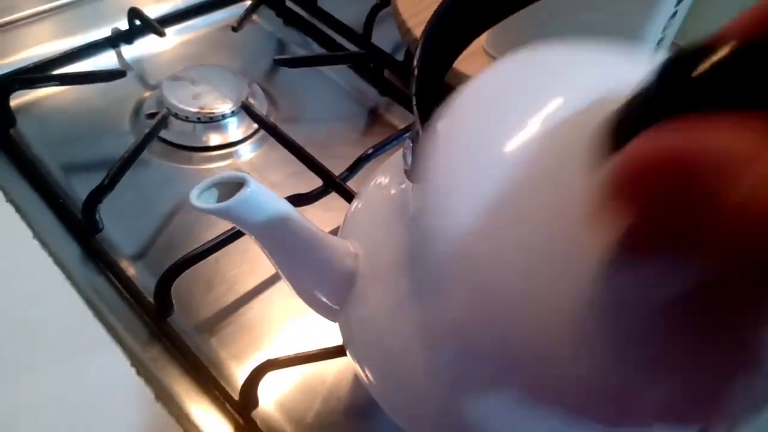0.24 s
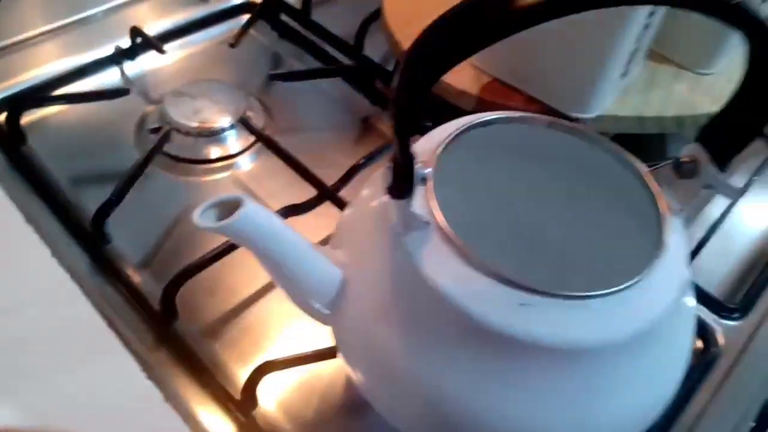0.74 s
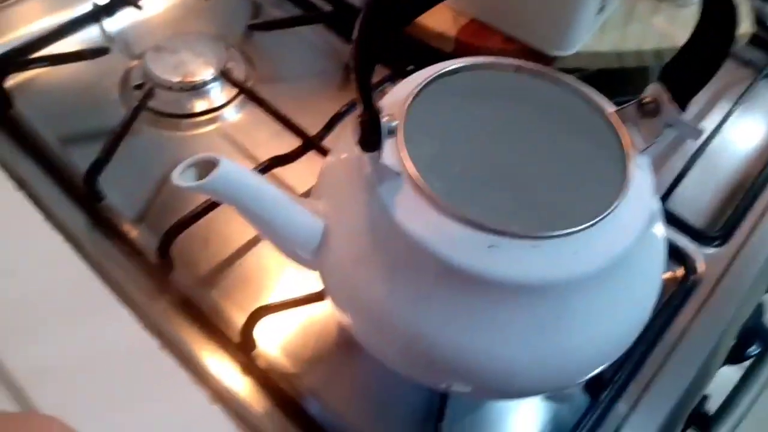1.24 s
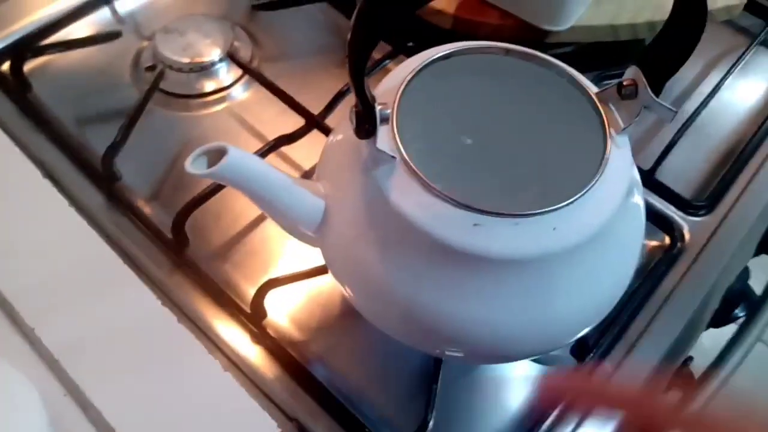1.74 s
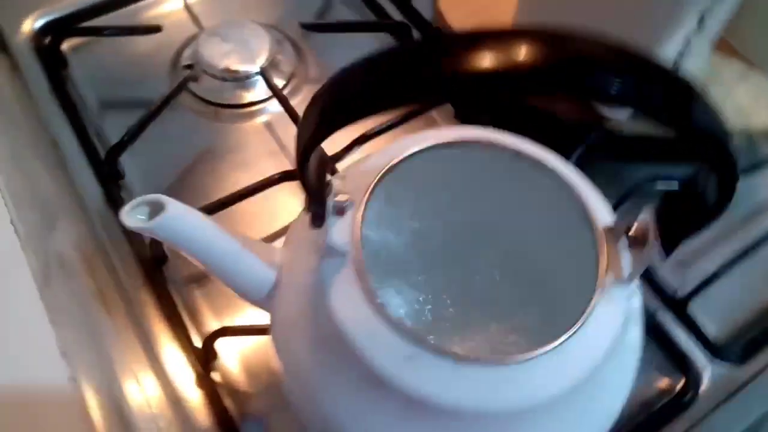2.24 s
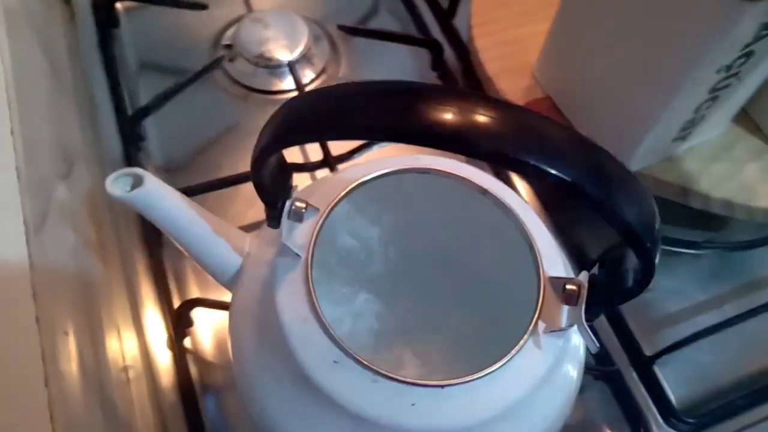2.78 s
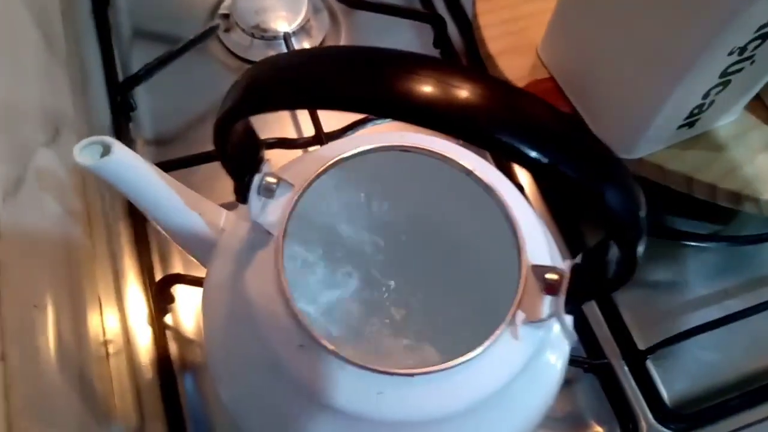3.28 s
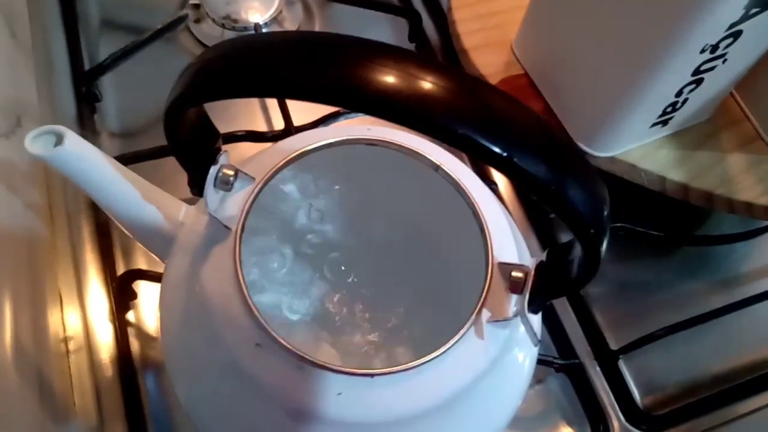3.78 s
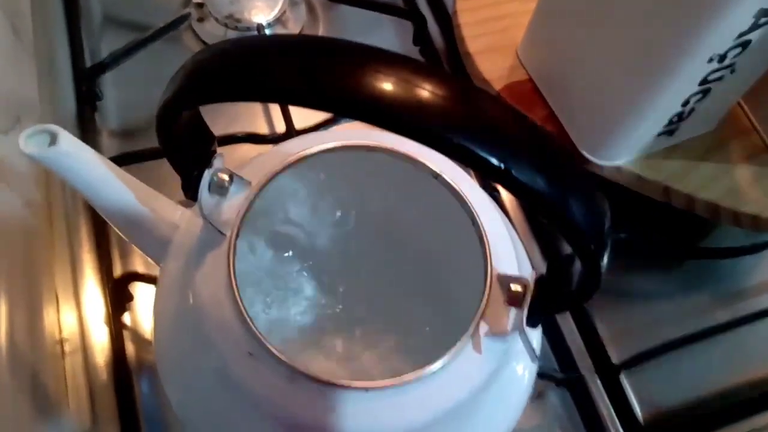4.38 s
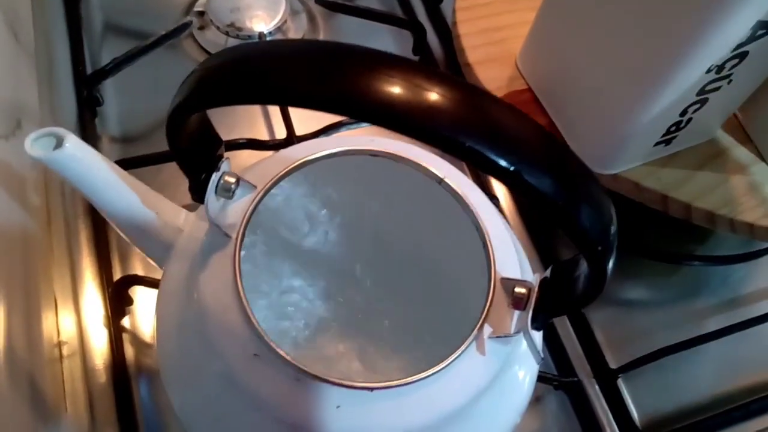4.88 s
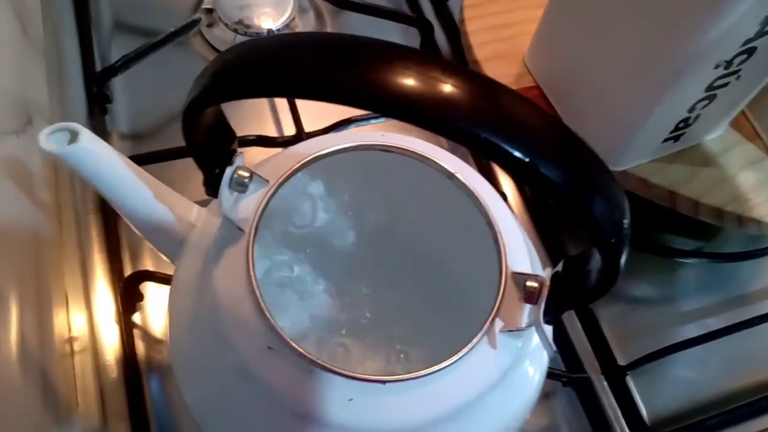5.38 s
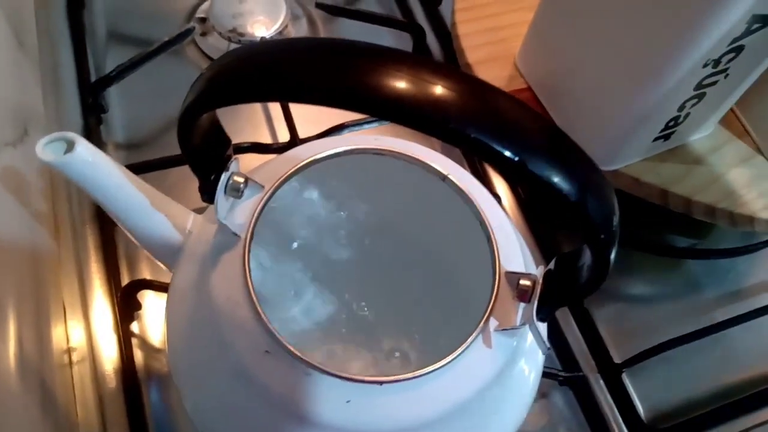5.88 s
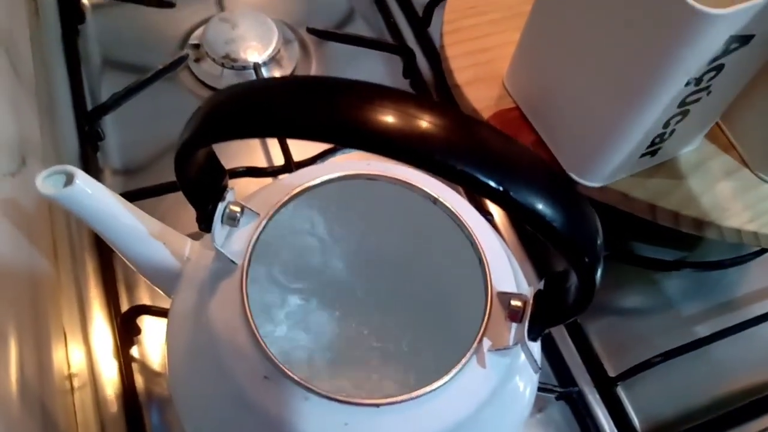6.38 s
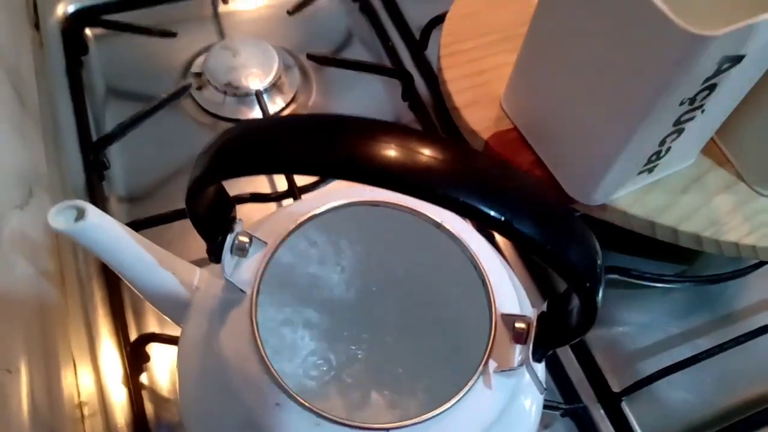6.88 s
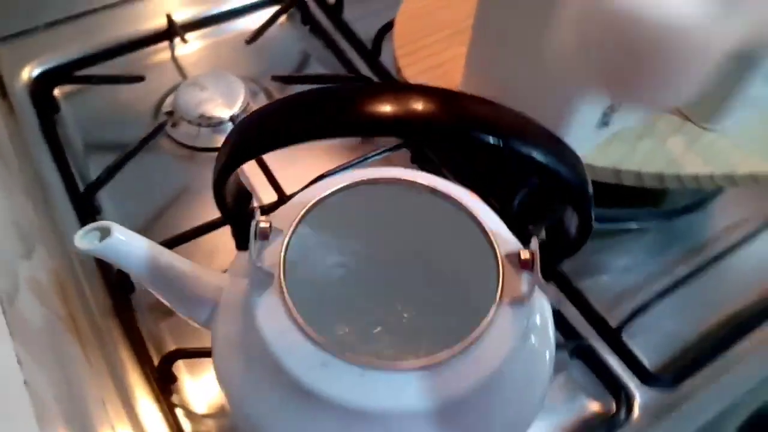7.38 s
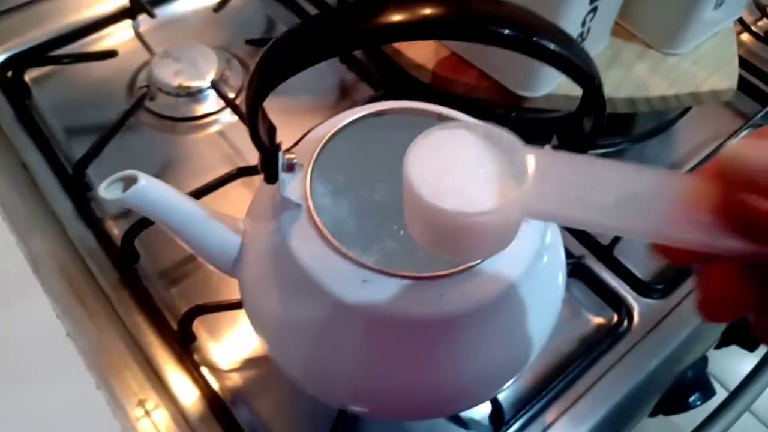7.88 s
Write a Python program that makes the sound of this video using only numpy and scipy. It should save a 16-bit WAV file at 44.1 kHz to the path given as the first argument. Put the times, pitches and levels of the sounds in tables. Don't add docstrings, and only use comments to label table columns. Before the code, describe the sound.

A metal kettle lid clatters down and is stilled beside a hissing gas stove, water simmers softly, then dull box knocks and a loud hollow thud.

```python
import sys
import numpy as np
from scipy import signal
from scipy.fft import rfft, irfft
from scipy.io import wavfile
from scipy.ndimage import uniform_filter1d

SR = 44100
rng = np.random.default_rng(int(sys.argv[2]) if len(sys.argv) > 2 else 0)


def natural_amplitude(level_db):
    exponent = np.asarray(level_db, float) / 20
    return 10 ** exponent


def persist_wave(psi):
    counts = np.round(np.clip(psi, -1, 1) * 32767).astype(np.int16)
    wavfile.write(sys.argv[1], SR, np.atleast_2d(counts).T)


N = 358533

# f/Hz, density/dB per Hz
HISS = [(15, -74), (25, -44.5), (53, -12.5), (114, -9), (157, -12), (317, 3), (545, -7.5), (796, -2.5),
        (1070, -9.5), (1650, -12.5), (1940, -11.5), (3080, -11.5), (10100, -12), (14800, -23),
        (16000, -21.5)]
HISS_DB = -52
# f/Hz, correlation/1
HISS_LIKENESS = [(60, -1.3), (180, 1), (550, 0.8), (1650, -0.29), (4970, 0.19), (15000, -0.2982)]
# f/Hz, left over right/dB
HISS_LEAN = [(60, 0), (180, 0), (550, 1), (1650, -5), (4970, -1), (15000, -5)]
# t/s, level above 3 kHz/dB, left over right/dB
FLAME = [(0.0, -57.5, -6.5), (0.47, -59, 3.5), (0.9, -55, 1), (1.58, -56.5, 0), (2.47, -55.5, -0.5),
         (3.1, -59, 0), (3.51, -56, -1), (4.01, -59, -2), (4.55, -56, -2.5), (5.07, -59, -6.5),
         (5.25, -55, -2), (6.25, -57, -3.5), (8.13, -57.5, -3.5)]
# f/Hz, width/Hz, level/dB
KETTLE = [(366, 310, -7), (792.6, 38.4, 8), (1960, 104, -1.5), (2674, 41, -7), (3910, 21.6, 4),
          (4727.3, 8.3, 5), (7150, 114, -4.5), (9010, 64, -39), (10040, 42, -3), (10752, 300, -9)]
# t/s, peak/dB, f/Hz, left over right/dB
POPS = [(0.004, -38, 567, -6), (0.136, -38, 1960, -5), (0.196, -40, 680, 3), (0.354, -41, 734, 3),
        (0.386, -37.5, 730, -2), (0.409, -44, 704.8, 0.5), (0.436, -38.5, 890, -6.5),
        (0.466, -41, 840, -4.5), (0.698, -41, 910, 0), (0.775, -42, 760.3, 0), (2.516, -47, 965.3, 7),
        (2.568, -35, 2030, 9), (2.58, -36, 2000, 3), (2.587, -40, 795, 0.0), (2.745, -37, 784.4, -7),
        (2.755, -38, 2050, -3), (4.972, -42, 2050, -3), (4.116, -44, 2600, -5), (2.856, -42, 744, -2),
        (4.06, -40.5, 1960, -9), (4.824, -40, 1950, -1), (4.579, -38, 1999, -13), (4.591, -46, 1500, -6.0),
        (5.402, -37, 1960, -9), (5.585, -39, 790, -10.5), (5.902, -35.5, 831.8, -5),
        (6.149, -48, 742.8, -13), (6.653, -38.5, 800, -11), (6.686, -36.5, 834, -9), (6.752, -42, 830, 1.5),
        (6.987, -43.5, 841.8, -7), (7.182, -41, 844, -3), (7.651, -39, 710, -7.5),
        (7.951, -38.5, 648.2, -5), (7.985, -44.5, 840.2, -10)]
TICKS_PER_S, TICK_DB = 30, -52

# t/s, length/s, level/dB, centre f/Hz
RUSTLE = [(0.0, 0.076, -62, 1900), (0.145, 0.19, -59, 1590), (0.31, 0.29, -56.5, 1130),
          (0.61, 0.1339, -58.5, 1198), (0.793, 0.1714, -55, 1150), (1.5, 0.1688, -63, 1694),
          (1.73, 0.049, -55, 2173), (1.86, 0.04, -52.5, 2511), (2.192, 0.22, -60.5, 1986),
          (7.14, 0.0417, -75, 1802), (7.243, 0.2613, -57, 2600), (7.525, 0.35, -62, 2100),
          (7.991, 0.0682, -69, 2201)]
SWEEP = 0.061

# f/Hz, t60/s
ROOM = [(100, 0.5985), (400, 0.3), (1500, 0.33), (5000, 0.2606), (15000, 0.42)]

# t/s, t60/s, force/dB, weight on the worktop/dB, grit/dB
SHOVES = [(2.635, 0.18, -40.5, -9, -20), (2.72, 0.976, -53.5, -7, -13), (2.9, 0.44, -50, -10, -6),
          (3.1, 0.46, -49, -21, -23), (3.261, 0.39, -41, -12, -23), (3.322, 0.2, -45, -18, -12),
          (4.08, 0.27, -38, -11.5, -17), (4.245, 0.25, -39, -9, -34), (4.33, 0.437, -41.5, -15, -17),
          (4.38, 0.3, -39, -18, -16), (4.46, 0.2705, -59, 0, -1), (4.79, 0.45, -55.5, 4.5, 5),
          (4.86, 0.31, -39, -12, -6.5), (5.12, 1, -42, -13, -1.5), (5.2, 0.99, -52, -9.5, 4.5),
          (5.418, 0.2512, -42.5, -2, -26.5), (5.52, 1, -59, 0, 1)]
SHOVE_RISE_S = [0.033, 0.014, 0.0078]
SHOVE_STRETCH = [1.3693, 1.19, 0.67]

# t/s, peak/dB, body f/Hz, t60/s, crack over peak/dB
KNOCKS = [(2.567, -43, 247, 0.04, 0.5), (2.624, -31.5, 275, 0.033, -21), (4.298, -39, 298, 0.036, -20),
          (4.421, -40, 237, 0.068, -20), (2.627, -27, 521, 0.065, -6.5), (2.638, -25, 488, 0.053, -9.5),
          (2.655, -33, 480, 0.034, -18.5), (3.104, -43, 262, 0.0669, -22.5), (3.158, -45, 247.7, 0.09, -17),
          (3.261, -48.5, 334, 0.0463, 8), (3.328, -28.5, 462.8, 0.041, -3.5),
          (4.083, -32, 483.2, 0.01508, -9), (4.119, -44, 576, 0.066, -6), (4.2455, -18, 520, 0.03, -12.5),
          (4.269, -48, 500, 0.0822, 5), (4.407, -39, 355, 0.075, -1)]
KNOCK_TILT_DB = -9
# frequency ratio/1, level/dB
OVERTONES = [(1, -3.5), (1.95, -13.5), (2.7, -15), (3.5, -26), (4.7, -28)]
# t/s, peak/dB, blow t60/s, crack over peak/dB
SLAMS = [(4.33, -32.5, 0.0461, -4), (4.35, -46, 0.3, -10), (4.385, -30, 0.017, -25),
         (4.854, -20.5, 0.0095, 2.5), (5.108, -8.5, 0.019, 1.5), (5.258, -39.5, 0.16, -12),
         (5.17, -35, 0.023, -10), (5.2, -32.5, 0.058, -6), (5.291, -41, 0.03, -5)]
# f/Hz, width/Hz, level/dB
SLAM_PANELS = [
    [(887, 25.36, 6.5), (2100, 37.36, -20), (3020, 60, -3), (4250, 13.04, 2.5), (4690, 68.9, -35.5)],
    [(890, 14, 3), (1280, 46, -1), (2038, 98.2, -14), (3000, 20, -6)],
    [(328, 22, -9), (834, 34, -7), (1076, 44, -2.5), (1440, 14, -6), (2870, 20.86, -18)],
    [(329, 13, -2), (530, 19, 2), (703, 15, 3), (900, 9.3, 2.5), (1331, 44, 1.5), (1760, 30, -1.5),
     (2600, 200, -14), (4000, 900, -16)],
    [(432, 18, 12), (539.9, 30, 10.5), (692, 52, 6.5), (382, 32, 2), (783, 33, 3.5), (1180, 150, -4.5),
     (1500, 140, -0.5), (1750, 100, -1.5), (2050, 160, 0), (2710, 40, -6), (3270, 110, -14),
     (4300, 170, -11.5)],
    [(1500, 60, -2), (2100, 20.75, 3), (3890.3, 40, -2.5), (4770, 55.69, -7)],
    [(500, 40, 1), (1850, 20, -1)],
    [(550, 45, 5), (1780, 230, -3), (3600, 91, -9), (4200, 100, -12)],
    [(1500, 30, 7), (2000, 30, -6)],
]

# f/Hz, width/Hz, level/dB
TOUCH_MODES = [(826.0, 9.3, -3), (1083.0, 11.0, 2.0), (1290.0, 199.4, -8.5), (1860, 27, -20),
               (2222, 25, 13), (3400, 37.3, -3), (3975, 50, -2), (4820, 87.9, -30), (6150, 35, 4.5),
               (8900, 40, -2), (9700, 64.1, -20.5), (10278, 36, -26), (11140, 32, -15.5),
               (14700, 49.5, -28.0)]
# f/Hz, width/Hz, level/dB
DROP_MODES = [(1000.0, 290, 6.0), (1380.0, 25.95, 2.5), (840, 75, 2), (1865, 35, 0), (2190, 47.0, 3),
              (2480, 34.0, -12), (3310, 300, -1.5), (3960, 106, 4.5), (6160, 65, 6.0), (8850, 90, 2),
              (9877.2, 67.0, -2.5), (11700, 34.0, -10.5), (13400, 200, -19), (14800, 300, -18)]
# f/Hz, width/Hz, level/dB
ROLL_MODES = [(833, 5.8, 0), (1050, 200, -8.5), (1380, 250, -14.5), (1660, 30, -17), (1950, 180, -17.5),
              (2290, 66, 9.5), (2470, 25, 2), (3170, 220, 0.5), (4000, 80, 0.5), (6170, 120, 3),
              (8830, 110, 1.5), (9820, 57, -3.5), (12060, 46, -11), (14700, 200, -25)]
CHATTER_PER_S = [900, 900, 1200]
GRIP_DB_PER_S = [506, 506, 2200]
# start t/s, grip t/s, end t/s
PHASES = [
    (0.972, 1.082, 1.133),
    (1.131, 1.261, 1.258),
    (1.257, 1.364, 1.5),
]
# t/s, held/s, force/dB, dome share/dB, rim share/dB
CONTACTS = [
    [(0.972, 0.016, -27.5, -13.5, -5), (1.012, 0.024, -32.5, -7.5, -4), (1.055, 0.05, -46, 9, 3)],
    [(1.134, 0.0011, -24, -12, 4), (1.155, 0.025, -43, -5, -1), (1.19, 0.0097, -32.5, -3, -6.5),
     (1.218, 0.022, -31.5, -7, -12)],
    [(1.259, 0.021, -34.5, 6, -1.5), (1.286, 0.028, -35, 9, -0.5), (1.335, 0.032, -34.5, 9.5, -4),
     (1.37, 0.02, -58, 3, 5), (1.4, 0.022, -55, 1, -13), (1.468, 0.02897, -55.5, 11.5, -6)],
]
LID_RISE_S = [0.00622, 0.00048, 0.0046]
LID_T60 = [0.25, 0.14, 0.1]
# f/Hz, left over right/dB
LID_LEAN = [(60, 0.0), (150, -0.5), (380, -6), (950, -8), (2380, -11), (5980, -5), (15000, -15)]
# t/s, peak/dB, tilt/dB per octave
BLOWS = [
    (0.973, -16, -10),
    (0.984, -22, -12),
    (0.993, -23, -12),
    (1.032, -21, -9),
    (1.127, -19, -6),
    (1.135, -7.5, -8.5),
    (1.141, -20, -6),
    (1.262, -30, -9),
]


def evened(x):
    return x / np.sqrt(np.mean(x ** 2) + 1e-20)


def read(points, hz):
    f, value = np.transpose(points)
    return np.interp(np.log(hz + 1), np.log(f + 1), value)


def add(mix, s, sound):
    part = mix[..., round(s * SR):][..., :sound.shape[-1]]
    part += sound[..., :part.shape[-1]]


def sides(x, pan_db):
    return x * natural_amplitude(np.array([[pan_db / 2], [-pan_db / 2]]))


def ring(x, hz, width):
    r = np.exp(-np.pi * max(width, 1) / SR)
    turn = 2 * np.pi * hz / SR
    return signal.lfilter([np.sin(turn)], [1, -2 * r * np.cos(turn), r * r], x)


def band(x, lo_hz, hi_hz):
    return signal.sosfilt(signal.butter(2, [lo_hz, hi_hz], "band", fs=SR, output="sos"), x)


def clicks(size, per_s, spread_db):
    happens, sign, force = rng.random((size, 3)).T
    size_db = spread_db * np.minimum(-np.log(force + 1e-9), 4)
    return (happens < per_s / SR) * np.sign(sign - .5) * natural_amplitude(size_db)


def crack(tilt_db, t60):
    t, hz = np.arange(2048) / SR, np.fft.rfftfreq(2048, 1 / SR)
    gain = natural_amplitude(tilt_db * np.log2(np.maximum(hz, 600) / 600)) * (hz > 250)
    noise = irfft(rfft(rng.standard_normal(2048)) * gain)
    burst = noise * natural_amplitude(-60 * t / t60) * np.minimum(t / 0.0001666, 1)
    return burst / abs(burst).max()


def stroke(t, s, rise, hold, t60):
    u = t - s
    release = natural_amplitude(-60 * np.clip(u - rise - hold, 0, 9) / max(t60, .01))
    return np.clip(u / max(rise, 1e-4), 0, 1) * release


def kitchen(x):
    taps = np.zeros((2, 24000))
    slots = np.arange(150, 23900, 20)
    at = slots + rng.integers(0, 20, (2, len(slots)))
    np.put_along_axis(taps, at, rng.choice([-1., 1.], at.shape), 1)
    taps[1] = 0.37 * taps[0] + 1.06 * taps[1]
    hz, t, z = signal.stft(taps, SR, nperseg=256)
    tail = signal.istft(z * natural_amplitude(-60 * t / read(ROOM, hz)[:, None]), SR, nperseg=256)[1]
    return signal.fftconvolve(x[None], tail / np.linalg.norm(tail[0]), axes=1)[:, :N]


def hum():
    noise = rng.standard_normal(N)
    upper = ring(ring(noise, 120.0, 28.74), 120.0, 28.74)
    lower = ring(ring(noise, 87.0, 8.0), 87.0, 8.0)
    return natural_amplitude(-69.0) * evened(upper) + natural_amplitude(-74.5) * evened(lower)


def flame():
    frames, hz = N // 256 + 6, np.fft.rfftfreq(1024, 1 / SR)
    a, b, c, d, patches = rng.standard_normal((frames, 513, 5)).T
    patches = evened(uniform_filter1d(uniform_filter1d(patches, 10, 0), 12, 1))
    flutter = evened(uniform_filter1d(rng.standard_normal(frames), 3))
    flicker_db = 1.6 * patches + .8 * flutter
    s, near_db, pan_db = np.transpose(FLAME)
    t = np.arange(frames) * 256 / SR
    high = np.clip(np.log2(hz / 700 + 1e-9) / 2, 0, 1)[:, None]
    level = read(HISS, hz)[:, None] + flicker_db + high * np.interp(t, s, near_db - near_db[-1])
    lean = (read(HISS_LEAN, hz)[:, None] + high * np.interp(t, s, pan_db)) / 2
    same = np.clip(read(HISS_LIKENESS, hz), -1, 1)[:, None]
    left = a + 1j * b
    right = same * left + np.sqrt(1 - same ** 2) * (c + 1j * d)
    z = np.array([left * natural_amplitude(lean), right * natural_amplitude(-lean)])
    hiss = signal.istft(z * natural_amplitude(level), nperseg=1024, noverlap=768)[1][:, :N]
    return natural_amplitude(HISS_DB - 1.0) * evened(hiss)


def simmer():
    out = np.zeros((2, N))
    for hz, width, db in KETTLE:
        walls = natural_amplitude(db) * np.sqrt(width) * evened(ring(clicks(N, 260, 5.75), hz, width))
        out += [walls * natural_amplitude(-8.5), np.roll(walls, -4) * natural_amplitude(2.0)]
    out *= natural_amplitude(-58.5) / np.sqrt(np.mean(out ** 2))
    ticks = band(clicks(N, TICKS_PER_S, 2.5), 1800, 7500)
    spits = signal.oaconvolve(ticks, crack(-1.3, 0.0061))[:N]
    out += sides(natural_amplitude(TICK_DB) * spits, -20)
    t = np.arange(1500) / SR
    for s, db, hz, pan_db in POPS:
        tone = np.sin(2 * np.pi * hz * t) * natural_amplitude(-60 * t / (26 / hz))
        snap = crack(-11 + 2.6 * np.log2(hz / 800), 0.002)[:1500]
        add(out, s, sides(natural_amplitude(db - 4.5) * (tone + 1.1 * snap), pan_db))
    return out


def rustle():
    t = np.arange(N) / SR
    grains = np.array([clicks(N, 2300, 5.7), clicks(N, 2500, 6.2)])
    out = np.zeros((2, N))
    for s, length, db, hz in RUSTLE:
        span = (t >= s) & (t < s + length)
        u = t[span]
        turn = np.exp(2j * np.pi * hz * (u + SWEEP * (u - s - length / 2) ** 2 / length))
        low = signal.lfilter(*signal.butter(2, 260, fs=SR), grains[:, span] / turn)
        out[:, span] += evened((turn * low).real) * natural_amplitude(db) * np.sin(np.pi * (u - s) / length)
    return out


def drag():
    t = np.arange(0, N + 32, 32) / SR
    slips, dust = clicks(N, 500, 2.3), clicks(N, 2300, 3.8)
    worktop = ring(slips, 91.6, 11.3) + 0.395 * ring(slips, 118.1, 49.96)
    box, grit = band(slips, 190, 515.0), band(dust, 1597, 7000)
    out = np.zeros(N)
    for k, (layer, trim_db) in enumerate(zip([worktop, box, grit], [-1, -4, -5])):
        power = np.zeros(len(t))
        for s, t60, db, weight_db, grit_db in SHOVES:
            force = natural_amplitude(db + [weight_db, 0, grit_db][k])
            power += (force * stroke(t, s, SHOVE_RISE_S[k], 0, t60 * SHOVE_STRETCH[k])) ** 2
        push = np.interp(np.arange(N) / SR, t, np.sqrt(power))
        out += evened(layer) * natural_amplitude(trim_db) * push
    return out


def knocks():
    out, t = np.zeros(N), np.arange(6000) / SR
    for s, db, hz, t60, crack_db in KNOCKS:
        box = np.zeros(len(t))
        for ratio, g in OVERTONES:
            box += natural_amplitude(g - 60 * t * np.sqrt(ratio) / t60) * np.sin(2 * np.pi * hz * ratio * t)
        box *= np.minimum(t / 0.0029, 1) ** 2
        add(out, s, natural_amplitude(db) * box / abs(box).max())
        add(out, s, natural_amplitude(db + crack_db) * crack(KNOCK_TILT_DB, 0.11))
    for (s, db, t60, crack_db), panels in zip(SLAMS, SLAM_PANELS):
        blow = np.r_[crack(-3, t60), np.zeros(4096)]
        door = np.zeros(len(blow))
        for k, (hz, width, g) in enumerate(panels):
            door += natural_amplitude(g) * np.sqrt(width) * (-1) ** k * evened(ring(blow, hz, width + 30))
        door = band(door, 240, 9700)
        door /= abs(door).max()
        add(out, s, natural_amplitude(db) * door)
        add(out, s, natural_amplitude(db + crack_db) * band(crack(-5.5, 2.5 * t60), 930, 11500))
        add(out, s + .007, natural_amplitude(db - 7.5) * door)
    return out


def lid_phase(phase, contacts, modes, per_s, grip_db_per_s):
    start, grip, end = phase
    t = np.arange(start, end, 1 / SR)
    parts = np.zeros((3, 2, len(t)))
    for hz, width, db in modes:
        drive = clicks(len(t), per_s, 2.5)
        drive[2] = 12
        tone = evened(ring(drive, hz, 0.47 * width))
        tone = evened(tone / (uniform_filter1d(tone ** 2, 600) + .05) ** .3)
        mode = sides(natural_amplitude(db) * np.sqrt(width) * tone, read(LID_LEAN, hz))
        mode[1] = np.roll(mode[1], -rng.integers(10, 22))
        parts[int(hz > 950) + int(hz > 2100)] += mode
    rattle = rng.standard_normal((2, len(t))) + 2 * clicks(len(t), per_s, 1.7)
    rattle_lean = natural_amplitude(np.array([[-4], [2.5]]))
    gripped = natural_amplitude(-grip_db_per_s * np.maximum(t - grip, 0))
    out = np.zeros((2, len(t)))
    for k, (edges, share) in enumerate(zip([(760, 1180.0), (1050, 2230), (2200, 4000)], [.1, .3, .15])):
        part = evened(parts[k]) + share * evened(band(rattle, *edges)) * rattle_lean
        held = np.sqrt(uniform_filter1d(part.mean(0) ** 2, 500) + 1e-3)
        power = np.zeros(len(t))
        for s, hold, db, dome_db, rim_db in contacts:
            force = natural_amplitude(db + [dome_db, 0, rim_db][k])
            swell = force * stroke(t, s, LID_RISE_S[k], hold, LID_T60[k])
            power += (swell * (gripped if s < grip else 1)) ** 2
        out += part / held * np.sqrt(power)
    return start, out * np.minimum((end - t) / .001, 1)


def lid():
    out = np.zeros((2, N))
    all_modes = [TOUCH_MODES, DROP_MODES, ROLL_MODES]
    for phase in zip(PHASES, CONTACTS, all_modes, CHATTER_PER_S, GRIP_DB_PER_S):
        add(out, *lid_phase(*phase))
    for s, db, tilt_db in BLOWS:
        add(out, s, sides(natural_amplitude(db) * crack(tilt_db, 0.011), -12))
    bright = signal.sosfilt(signal.butter(8, 750, "high", fs=SR, output="sos"), out)
    return bright + natural_amplitude(-17) * band(out, 200, 600)


def scene():
    metal, wood, rub = lid(), knocks(), drag()
    near = sides(wood + rub, -1.2)
    low = band(near[1], 40, 2000)
    near[1] += np.roll(low, 4) - low
    wet = kitchen(natural_amplitude(-7.5) * wood + natural_amplitude(-11.0) * metal.mean(0) + natural_amplitude(-18) * rub)
    return hum() + flame() + simmer() + rustle() + near + metal + wet


def low_pass(x):
    return signal.sosfilt(signal.butter(12, 15600, fs=SR, output="sos"), x)


def record(dry):
    heard = signal.sosfilt(signal.butter(3, 62, "high", fs=SR, output="sos"), dry)
    return low_pass(heard)


dry = scene()
out = record(dry)
persist_wave(out)
```